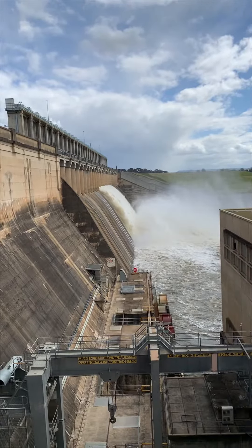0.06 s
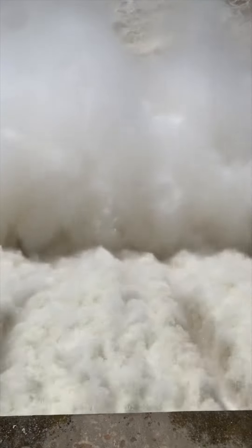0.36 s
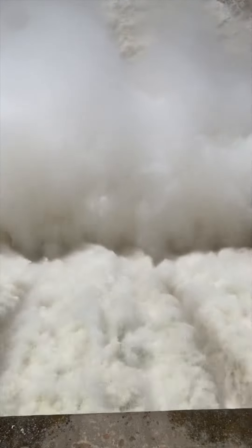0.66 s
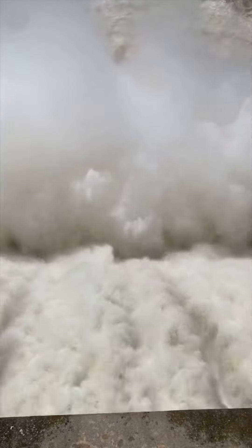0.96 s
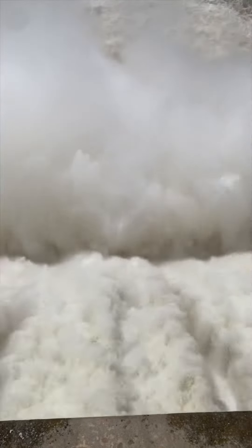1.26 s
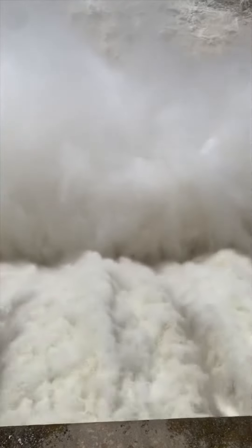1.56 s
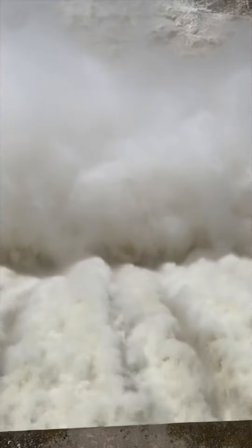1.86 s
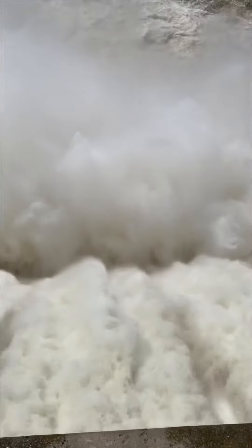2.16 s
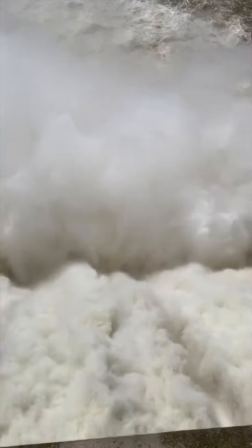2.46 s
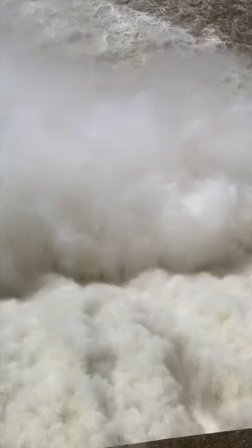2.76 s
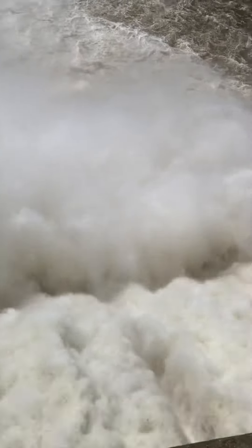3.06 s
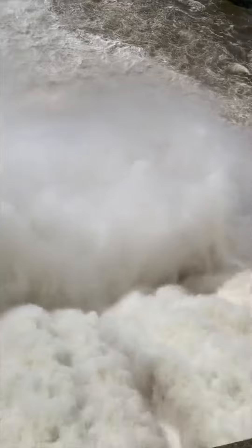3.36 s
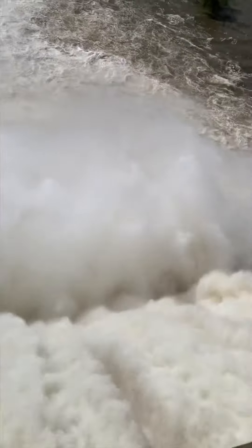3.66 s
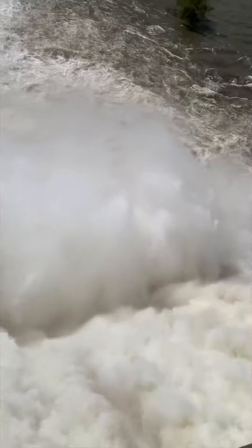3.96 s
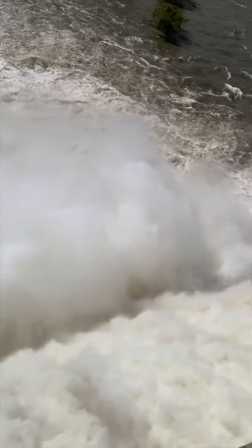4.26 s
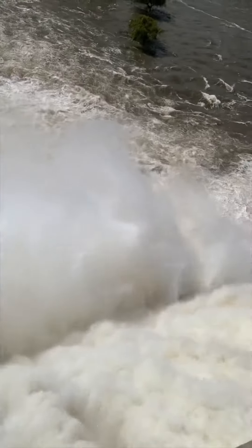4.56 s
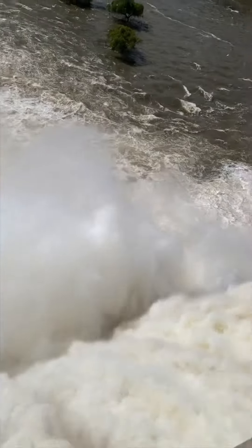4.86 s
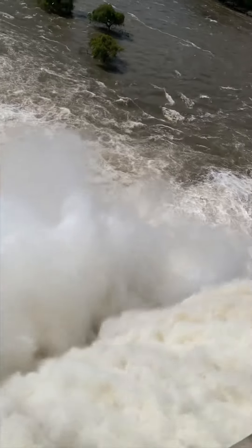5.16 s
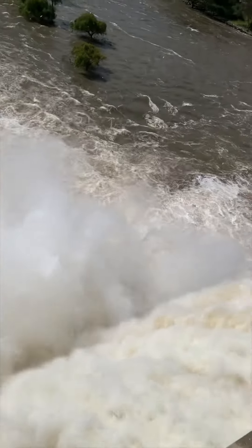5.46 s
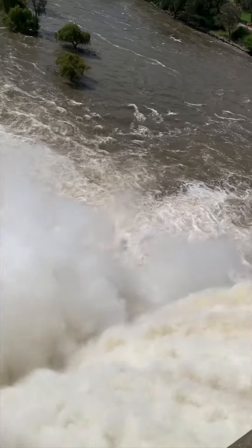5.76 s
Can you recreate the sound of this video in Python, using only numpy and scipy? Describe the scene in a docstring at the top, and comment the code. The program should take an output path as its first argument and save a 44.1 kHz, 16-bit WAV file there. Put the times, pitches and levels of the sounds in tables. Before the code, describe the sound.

Water rushes down a dam spillway over a deep roar, while wind increasingly rumbles and thumps on the microphone.

```python
"""On the crest of a dam: water pours down the spillway, a wide rush of spray over a deep plunge-pool roar.
For an instant it is far off and dull, then close. Clumps of water and spatter make the rush flicker,
and the concrete chute and parapet give it a hollow colour. As the microphone turns downstream, the
stereo image shifts and the wind rises, rumbling, thumping and popping on its two ports."""
import sys
import numpy as np
from scipy import signal
from scipy.fft import rfft, irfft
from scipy.io import wavfile
from scipy.ndimage import uniform_filter1d

SR = 44100
rng = np.random.default_rng(int(sys.argv[2]) if len(sys.argv) > 2 else 0)


def digitize_waveform(pressure):
    """Quantize a signal to 16-bit integers and store it at the path in sys.argv[1].

    Rows of a 2-D input are taken as channels; values are limited to [-1, 1].
    """
    field = np.atleast_2d(pressure).T
    bounded = np.clip(field, -1, 1)
    quanta = np.round(bounded * 32767).astype(np.int16)
    wavfile.write(sys.argv[1], SR, quanta)


N = 265085
TIMES = np.arange(N) / SR
FRAME, HOP = 1024, 256
BINS = np.fft.rfftfreq(FRAME, 1 / SR)
FRAME_TIMES = np.arange(N // HOP + 5) * HOP / SR


def gain_of(db):
    """Decibels to amplitude."""
    return 10 ** (np.asarray(db) / 20)


def unit_rms(x):
    """Scales to rms 1."""
    return x / np.sqrt(np.mean(abs(x) ** 2) + 1e-20)


def at_hz(rows, hz):
    """Reads each column of a table over log frequency."""
    f, *columns = np.transpose(rows)
    return np.squeeze([np.interp(np.log(hz + 1), np.log(f + 1), c) for c in columns])


def at_time(rows, t):
    """Reads each column of a table over time."""
    s, *columns = np.transpose(rows)
    return np.squeeze([np.interp(t, s, c) for c in columns])


def add_centred(mix, s, sound):
    """Adds a sound centred on the given time."""
    start = round(s * SR) - len(sound) // 2
    sound = sound[max(-start, 0):]
    part = mix[max(start, 0):][:len(sound)]
    part += sound[:len(part)]


def noise(spectrum, size=N):
    """Noise of rms 1, coloured by a table of f/Hz, relative level/dB."""
    colour = gain_of(at_hz(spectrum, np.fft.rfftfreq(size, 1 / SR)))
    return unit_rms(irfft(rfft(rng.standard_normal(size)) * colour, size))


def puff(spectrum, width_s, size=8192):
    """A short bell-shaped swell of noise, of rms 1 at its top."""
    t = (np.arange(size) - size // 2) / SR
    swell = np.exp(-.5 * (t / width_s) ** 2)
    return unit_rms(noise(spectrum, size) * swell) * np.sqrt(np.mean(swell ** 2))


def patches(seconds, width_hz):
    """A smooth random field over frames and bins, with lumps of the given length and width."""
    shape = len(FRAME_TIMES), len(BINS)
    field = np.fft.rfft2(rng.standard_normal(shape))
    over_time = np.fft.fftfreq(len(FRAME_TIMES), HOP / SR)[:, None] * seconds
    over_bins = np.fft.rfftfreq(len(BINS), SR / FRAME) * width_hz
    smoothing = np.exp(-2 * (over_time ** 2 + over_bins ** 2))
    return unit_rms(np.fft.irfft2(field * smoothing, shape))


def wander(seconds, width_hz):
    """A smooth random control curve: the lowest bin of a field of patches, read at every sample."""
    return np.interp(TIMES, FRAME_TIMES, unit_rms(patches(seconds, width_hz)[:, 0]))


def turned(t):
    """How far the microphone has turned: 0 faces the chute, 1 faces downstream."""
    # the microphone's swing: t/s, turn/0-1
    heading = [(3.25, 0.02), (3.55, 0.42), (4.4, 0.54), (4.8, 0.9), (5.1, 1), (5.45, 1), (5.68, 0.78),
               (5.78, 0.93), (5.88, 0.78), (5.99, 0.95)]
    return np.clip(at_time(heading, t), 0, 1)


def coherence(ports, lag_s=.000238):
    """Complex likeness of the two ports in each bin; above the table the right port simply lags."""
    likeness, lead = at_hz(ports, BINS)
    lead = lead + 2 * np.pi * lag_s * np.maximum(BINS - ports[-1][0], 0)
    return np.clip(likeness, 0, 1) * np.exp(-1j * lead)


def at_ports(field_db, waver=.08, opposed_turn=.95):
    """Stereo noise under a dB field: mono bass, mids whose image wavers, treble with a fixed lag."""
    # stereo image facing the chute: f/Hz, likeness/0-1, left lead/rad
    chute_image = [(850, .25, .5), (1080, .72, -2.7), (1200, .3, -4.3), (1330, .7, -6.3), (1450, .45, -6.7),
                   (1560, .1, -6.3), (1680, .32, -5.7), (2050, .15, -5), (2250, .28, -3.9),
                   (2480, .73, -3.6), (3250, .6, -5), (3700, .8, -4.7), (4180, 1, -4.03)]
    # halfway round: f/Hz, likeness/0-1, left lead/rad
    halfway_image = [(1200, .65, 3.1), (1500, .52, 2.8), (1750, .47, 2), (2100, .55, 2), (2450, .76, 2.6),
                     (2850, .74, 2), (3200, .6, 1.5), (3700, .83, 1.45), (4180, 1, 2.25)]
    # downstream, the mids hollow and in opposite phase: f/Hz, likeness/0-1, left lead/rad
    river_image = [(1400, 1, 3.15), (2300, .998, 3.15), (2750, .92, 3.15), (3150, .6, 3.1),
                   (3500, .42, 2.2), (3750, .72, 1.7), (4180, 1, 2.25)]
    # crossover below which the sound is mono, rising with the wind: t/s, f/Hz
    mono_below = [(.1, 1050), (.2, 830), (.6, 660), (3.3, 730), (3.85, 870), (4.05, 1190), (5, 1290)]
    wavering = 1 + waver * patches(seconds=.09, width_hz=600)
    turn = np.clip(turned(FRAME_TIMES)[:, None] * wavering, 0, 1)
    chute = np.maximum(1 - 2 * turn, 0)
    river = np.interp(turn, [.5, opposed_turn], [0, 1])
    likeness = chute * coherence(chute_image) + river * coherence(river_image)
    likeness += (1 - chute - river) * coherence(halfway_image)
    mono = 1 / (1 + (BINS / at_time(mono_below, FRAME_TIMES)[:, None]) ** 26)
    likeness = mono + (1 - mono) * likeness
    draws = rng.standard_normal((4, len(FRAME_TIMES), len(BINS)))
    left, unrelated = draws[::2] + 1j * draws[1::2]
    right = likeness * left + np.sqrt(np.maximum(1 - abs(likeness) ** 2, 0)) * unrelated
    spectra = np.array([left, right]) * gain_of(field_db)
    _, stereo = signal.istft(spectra.swapaxes(1, 2), nperseg=FRAME, noverlap=FRAME - HOP)
    return unit_rms(stereo[:, :N])


def far_rush(level_db=-26.5):
    """The spillway from across the valley, its treble lost in the air."""
    # dull, distant wash: f/Hz, relative level/dB
    colour = [(400, 0), (650, -13.5), (900, -8), (1400, -16.5), (2000, -19.5), (4000, -26), (7500, -38),
              (10000, -52), (15000, -57)]
    return gain_of(level_db) * at_ports(at_hz(colour, BINS))


def wind(gust_db=1.65, gust_s=.11, steady_s=.1):
    """Turbulence rumbles on the microphone, riding slow swells of wind and quick random gusts."""
    # slow swells of the wind: t/s, level/dB
    swells = [(0, -20.5), (.3, -31), (.9, -49), (1.2, -24), (2.65, -23), (2.78, -39), (3, -27), (3.45, -31),
              (3.6, -22.5), (4, -27), (4.5, -27), (4.72, -33), (4.95, -22.5), (5.2, -22), (5.5, -15),
              (5.62, -18), (5.71, -23), (5.83, -18), (5.92, -28), (6, -21.5)]
    # tone of the rumble: f/Hz, relative level/dB
    colour = [(15, -38), (30, -17), (46, -0.5), (70, 1.5), (120, -4), (200, -9), (350, -23.5), (700, -41),
              (1500, -89)]
    gusts = wander(seconds=gust_s, width_hz=127)
    rumble = noise(colour)
    rumble /= np.sqrt(uniform_filter1d(rumble ** 2, int(steady_s * SR)))  # iron out its own swells
    return gain_of(at_time(swells, TIMES) + gust_db * gusts) * rumble


def buffets(thump_s=.017, flutter_s=.013, skirt_db=-17):
    """Each buffet of wind is a short thump, an octave wide, with a flutter as it grazes the port."""
    # the strongest hits of wind: t/s, thump level/dB, thump f/Hz, flutter level/dB
    hits = [(0.096, -25, 65, -36), (0.412, -17, 65, -31), (0.552, -21.5, 117, -35), (1.07, -22, 109, -28),
            (1.42, -20.5, 125, -36), (1.777, -26, 95, -42), (2.552, -16, 119, -34), (2.624, -19, 58, -38),
            (3.61, -18, 66, -30), (3.69, -26, 115, -36), (3.785, -20, 68, -27), (3.85, -25.5, 230, -29),
            (4.093, -21, 72, -29), (4.347, -23.5, 230, -29), (4.405, -19.5, 149, -28),
            (4.64, -23, 169, -38), (4.78, -16, 67.4, -26), (4.888, -20.5, 130, -25),
            (5.071, -18.5, 125, -21.5), (5.275, -17, 108, -35), (5.365, -16, 130, -26),
            (5.59, -15.5, 145, -23.5), (5.65, -23, 80, -29), (5.81, -16, 85, -22.5)]
    # tone of the flutter: f/Hz, relative level/dB
    flutter = [(80, -20), (170, 1.5), (330, -1), (500, -10), (900, -15), (1300, -17), (1700, -54),
               (3000, -65)]
    out = np.zeros(N)
    for s, thump_db, hz, flutter_db in hits:
        thump = [(hz * 2. ** octave, skirt_db * octave ** 2) for octave in np.linspace(-2.5, 2.5, 11)]
        add_centred(out, s, gain_of(thump_db) * puff(thump, thump_s))
        add_centred(out, s, gain_of(flutter_db) * puff(flutter, flutter_s))
    return out


def eddies(half_length_cycles=.45, size=4096):
    """An eddy tears off the edge of the port: a single swing of pressure, the slower the bigger it is."""
    # big eddies thud, small ones pop: t/s, envelope peak/dB, f/Hz
    strikes = [(0.089, -10.5, 56), (0.411, -14, 65), (1.778, -8.5, 130), (2.619, -12, 50),
               (3.617, -10.5, 60), (4.093, -11.5, 75), (4.155, -14, 200), (4.397, -12.5, 200),
               (4.411, -13, 480), (4.646, -7, 220), (4.755, -16, 850), (4.783, -12, 85), (4.857, -13, 430),
               (4.897, -14, 500), (5.072, -12.5, 600), (5.082, -10, 115), (5.465, -11, 100),
               (5.486, -12, 330), (5.59, -10, 220), (5.615, -9, 90), (5.647, -11, 100), (5.665, -6.5, 250),
               (5.789, -12, 180), (5.793, -16, 880), (5.805, -4.5, 90)]
    out = np.zeros(N)
    t = (np.arange(size) - size // 2) / SR
    for (s, db, hz), phase in zip(strikes, rng.random(len(strikes))):
        swell = np.exp(-.5 * (t * hz / half_length_cycles) ** 2)
        add_centred(out, s, gain_of(db) * swell * np.cos(2 * np.pi * (hz * t + phase)))
    return out


def plunge_pool(level_db=-24, churn_db=1.0):
    """Masses of water and trapped air heave at the foot of the chute."""
    # deep roar of the pool: f/Hz, relative level/dB
    roar = [(20, -32), (35, -8), (55, 3.5), (90, 2.5), (135, 2.5), (185, -3), (240, -7), (330, -21.5),
            (600, -83)]
    churn = gain_of(churn_db * wander(seconds=.034, width_hz=160))
    return gain_of(level_db) * unit_rms(noise(roar) * churn)


def concrete_db(ring_hz=1335, width_hz=60, ring_db=2.7, drift_hz=18, echo_s=.00296):
    """The chute's hollow ring fades as the microphone turns away; the parapet's echo combs the rush."""
    # comb ripple from the parapet: f/Hz, depth/dB
    ripple = [(500, .7), (1700, .8), (3000, .2)]
    facing = (1 - turned(FRAME_TIMES)[:, None]) ** 4
    centre_hz = ring_hz + drift_hz * unit_rms(patches(seconds=.4, width_hz=150)[:, :1])
    ring = np.exp(-.5 * ((BINS - centre_hz) / width_hz) ** 2)
    comb_db = at_hz(ripple, BINS) * np.cos(2 * np.pi * BINS * echo_s)
    return ring_db * facing * ring + comb_db


def close_rush(level_db=-22, low_cut_hz=190, full_hiss_db=-31, spatter_db=.79):
    """Spray and foam: clumps of water colour narrow bands, spatter flickers over wide ones."""
    # wide wash of spray: f/Hz, relative level/dB
    colour = [(250, 0), (380, -5.4), (520, -9.5), (800, -8.7), (1200, -10.9), (1550, -13), (1850, -13.5),
              (2700, -11.8), (3350, -14.2), (4150, -11.8), (4750, -13.6), (5450, -12.4), (6500, -14.5),
              (7850, -16.4), (8150, -14.4), (12000, -18.4), (15700, -23.2)]
    # the spray fades steadily as the microphone leaves the chute: f/Hz, slope/(dB/s)
    spray_fade = [(450, 0), (800, -0.06), (1400, -0.1), (2000, -0.12), (3500, 0), (6000, -0.07),
                  (9000, -0.42), (15000, -.5)]
    # the hiss dips now and then: t/s, level/dB (counted against full_hiss_db)
    hiss = [(0.15, -33.5), (0.31, -32.5), (2.69, -33), (2.73, -37.5), (2.87, -37.3), (2.9, -32.9),
            (3.48, -32.2), (3.77, -32.7), (3.795, -37.2), (4.1, -38.9), (4.29, -38), (4.5, -34.8),
            (4.57, -38.2), (5.05, -38.3), (5.57, -33.1), (5.99, -36.3)]
    # the band that dips: f/Hz, share/0-1
    dip_band = [(400, .08), (1000, .2), (1500, .33), (2200, .46), (3200, .6), (4500, 1), (7850, .65),
                (8150, .04)]
    # grain of the rush, smoothest in the finest spray: f/Hz, share/0-1
    lumpiness = [(500, .7), (1300, 1), (4000, .6), (9000, .45)]
    field_db = at_hz(colour, BINS) - 10 * np.log10(1 + (low_cut_hz / (BINS + 1)) ** 10)
    field_db = field_db + FRAME_TIMES[:, None] * at_hz(spray_fade, BINS)
    dip_db = at_time(hiss, FRAME_TIMES)[:, None] - full_hiss_db
    field_db += dip_db * at_hz(dip_band, BINS)
    field_db += concrete_db()
    clumps_db = 1.5 * patches(seconds=.07, width_hz=120) + patches(seconds=.025, width_hz=500)
    field_db += clumps_db * at_hz(lumpiness, BINS)
    field_db += spatter_db * patches(seconds=.02, width_hz=1500)
    return gain_of(level_db) * at_ports(field_db)


def scene(close_at_s=.123, stop_s=.002, fade_s=.024):
    """The far water stops short and the close water fades in; wind blows on both."""
    far = np.clip((close_at_s - TIMES) / stop_s, 0, 1)
    close = np.clip((TIMES - close_at_s) / fade_s, 0, 1)
    air = wind() + buffets() + eddies()
    return far * (far_rush() + air) + close * (close_rush() + plunge_pool() + air)


def record(dry, cutoff_hz=15900):
    """A steep low-pass takes off the very top of the hiss."""
    low_pass = signal.firwin(511, cutoff_hz, window=("kaiser", 9), fs=SR)
    return signal.oaconvolve(dry, low_pass[None], "same")


dry = scene()
out = record(dry)
digitize_waveform(out)
```